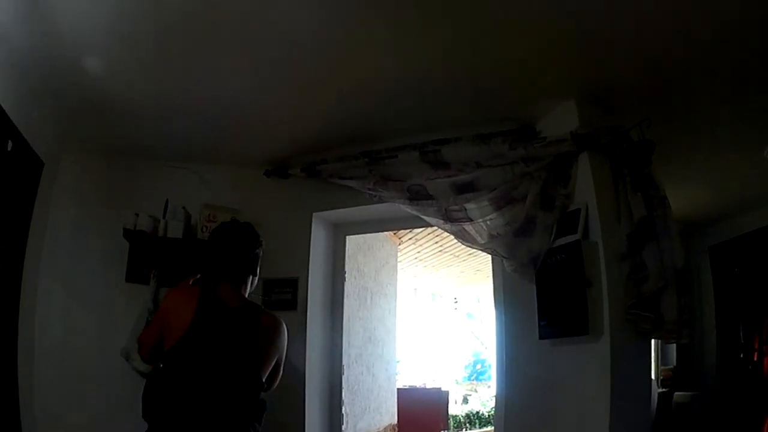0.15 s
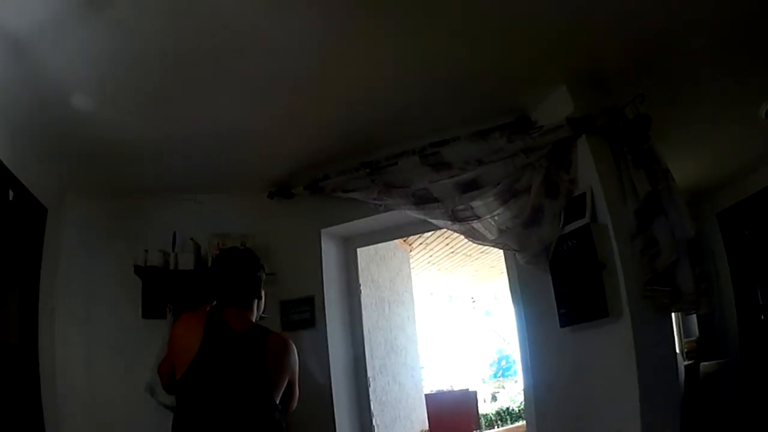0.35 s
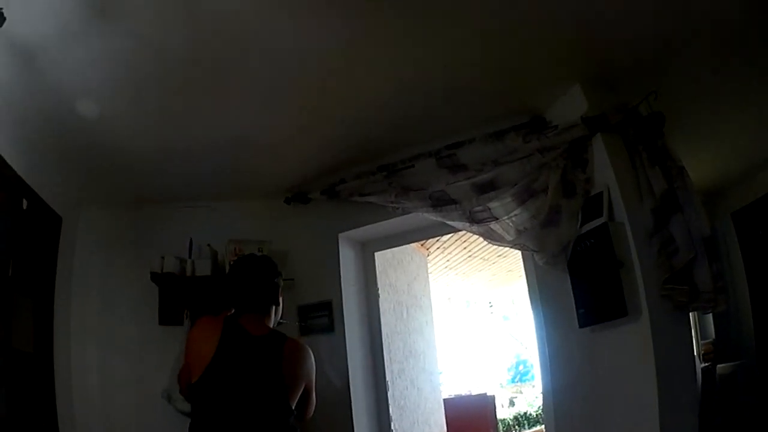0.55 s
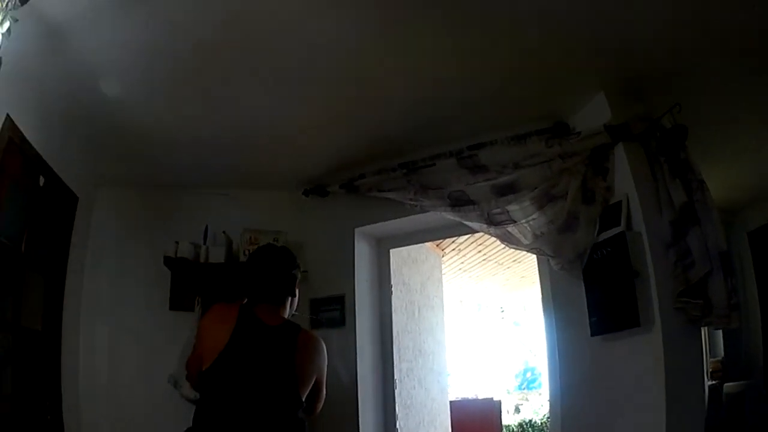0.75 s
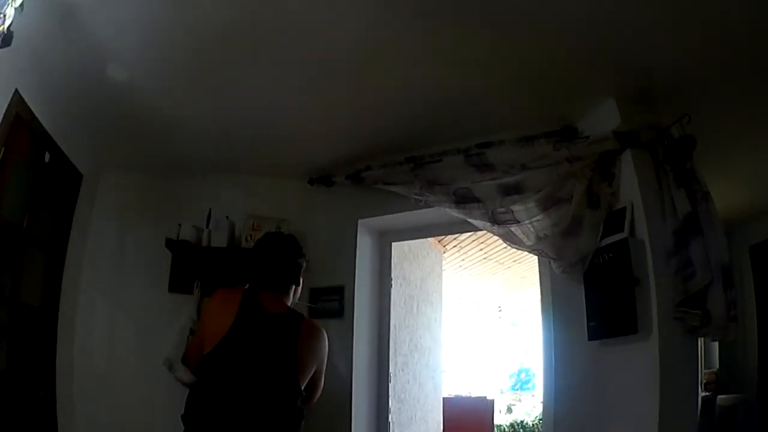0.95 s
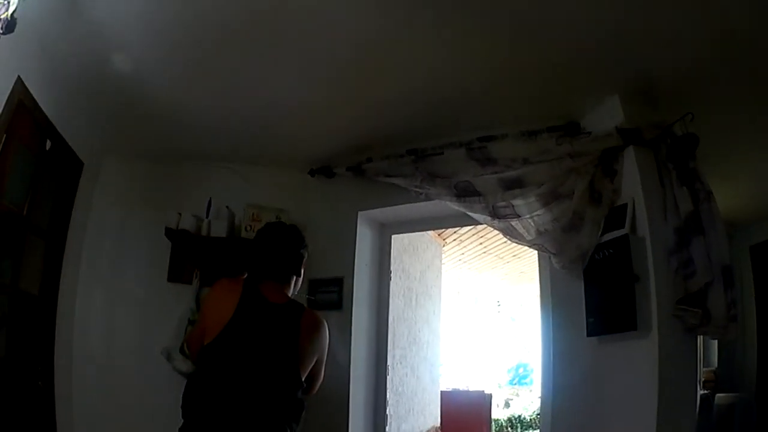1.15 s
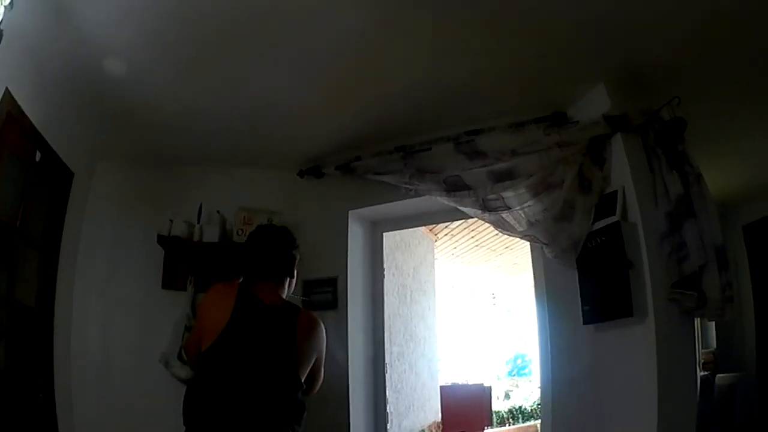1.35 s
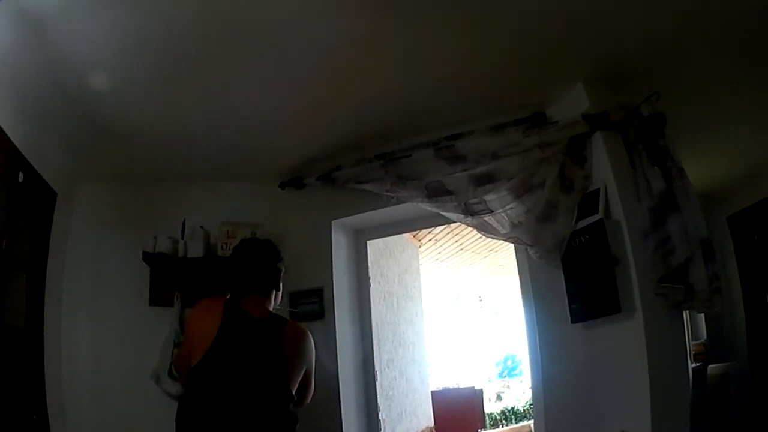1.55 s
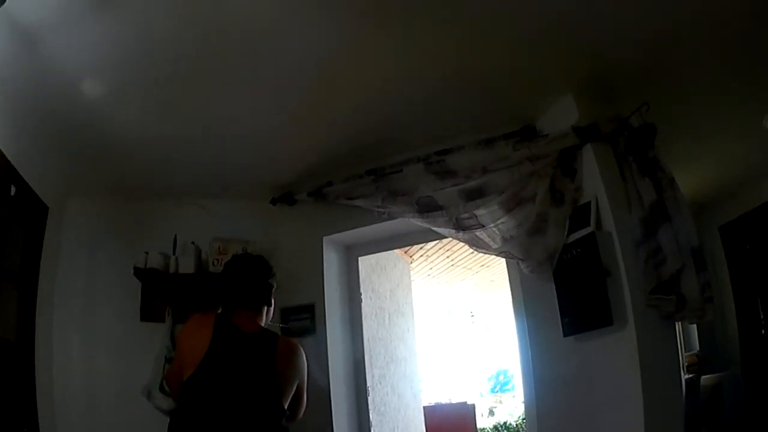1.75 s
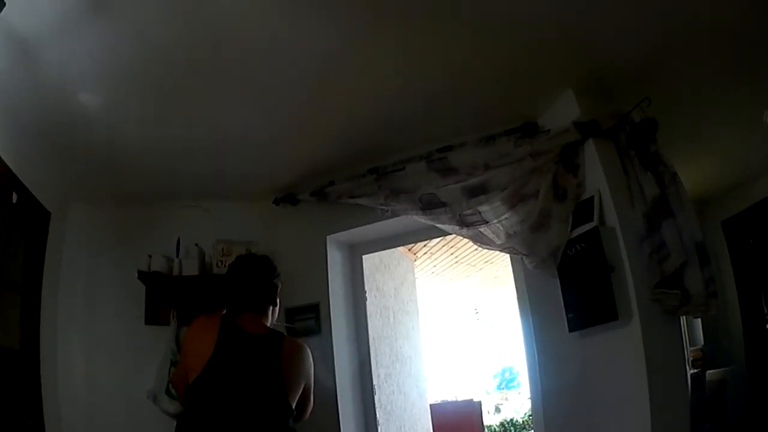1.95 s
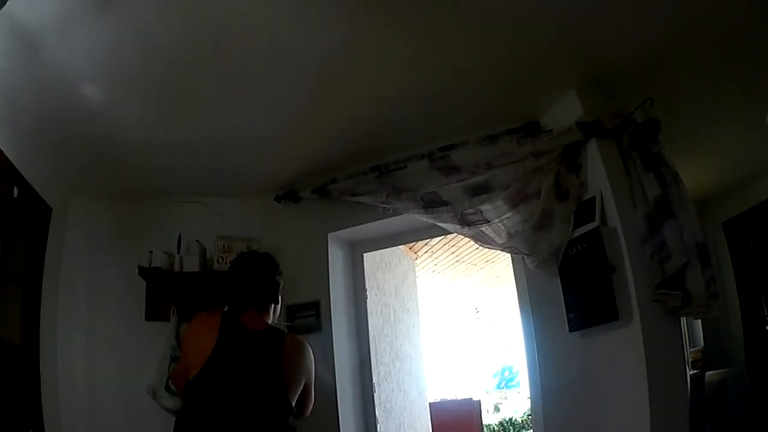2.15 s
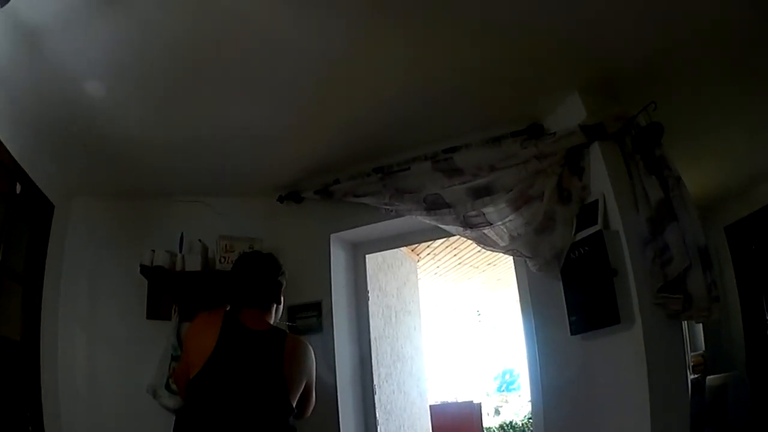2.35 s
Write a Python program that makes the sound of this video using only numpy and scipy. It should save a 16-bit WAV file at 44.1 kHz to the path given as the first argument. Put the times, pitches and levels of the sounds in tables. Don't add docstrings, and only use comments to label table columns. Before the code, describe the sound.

A hammer drill bores into a masonry wall in three loud pulsing surges indoors

```python
import sys
import numpy as np
from scipy import signal
from scipy.fft import rfft, irfft, next_fast_len
from scipy.io import wavfile
from scipy.ndimage import uniform_filter1d, minimum_filter1d

SR = 44100
rng = np.random.default_rng(int(sys.argv[2]) if len(sys.argv) > 2 else 0)


def boost_factor(decibels):
    exponent = np.asarray(decibels, float) / 20
    return 10 ** exponent


def materialize(psi):
    bounded = np.clip(np.atleast_2d(psi).T, -1, 1)
    quanta = np.round(bounded * 32767).astype(np.int16)
    wavfile.write(sys.argv[1], SR, quanta)


N = 110250
SIZE = next_fast_len(N + SR)
HZ = np.maximum(np.arange(SIZE // 2 + 1) * SR / SIZE, 1)


def rms_one(x):
    return x / np.sqrt(np.mean(x ** 2) + 1e-20)


def in_time(rows, column=1):
    rows = np.array(rows)
    return np.interp(np.arange(N) / SR, rows[:, 0], rows[:, column])


def at_hz(points, hz):
    points = np.array(points)
    return np.interp(np.log(hz), np.log(points[:, 0]), points[:, 1])


def colour(x, spectrum):
    gain = rms_one(boost_factor(at_hz(spectrum, HZ)))
    return irfft(rfft(x, SIZE) * gain, SIZE)[..., :N]


def ring(x, hz, t60):
    radius = boost_factor(-60 / (t60 * SR))
    angle = 2 * np.pi * hz / SR
    push = np.sqrt((1 - radius * radius) / 2) * np.array([1, 0, -1])
    return signal.lfilter(push, [1, -2 * radius * np.cos(angle), radius * radius], x + 1e-18)


def ring_all(make_drive, modes):
    return sum(boost_factor(db) * ring(make_drive(), hz, t60) for hz, db, t60 in modes)


# frequency in Hz, likeness from -1 to 1 [no unit].
STEREO_LIKENESS = [(40, .93), (200, .999), (530, .95), (1590, .8), (4740, .25), (14200, -.1)]


def pair(noises):
    mid, side = rfft(noises, SIZE)
    alike = np.clip(at_hz(STEREO_LIKENESS, HZ), -1, 1)
    return (np.sqrt(1 + alike) * mid + np.sqrt(1 - alike) * side * [[1], [-1]]) / np.sqrt(2)


# frequency in Hz, level in dB per Hz.
RUMBLE_COLOUR = [(15, -44), (25, -22), (96, -9.5), (129, -3), (278, -0.5), (649, -1.5), (1100, 3),
                 (14000, -38.5)]


def rumble():
    noise = irfft(pair(rng.standard_normal((2, SIZE))), SIZE)[:, :N]
    return boost_factor(-43) * rms_one(colour(noise, RUMBLE_COLOUR))


# time in seconds, speed in blows per second.
PISTON_SPEED = [(0.56, 0.0), (0.64, 14.15), (0.74, 40.54), (0.84, 36.41), (0.98, 22.79), (1.17, 8.98),
                (1.28, 25.61), (1.36, 39.39), (1.48, 36.72), (1.62, 23.73), (1.81, 12.4), (1.9, 28.4),
                (1.98, 43.29), (2.14, 41.2), (2.3, 25.77), (2.44, 16.58), (2.5, 14.26)]
# time in seconds, pressure on the tool in dB, motor load in dB.
TOOL_PUSH = [(.55, -12, -10.5), (.66, 2, -2), (.75, 0.5, -1), (.9, 1.5, -2), (1.05, 2, -4.5),
             (1.19, 5.5, -4), (1.27, -2, -2), (1.35, 7, 1), (1.5, 11, 10), (1.62, -1, -48),
             (1.78, 5.5, -3.5), (1.89, -1.5, -3), (1.96, 8.5, 7), (2.15, -2.5, -6.5), (2.3, 4.5, 0),
             (2.42, -2, -5.5), (2.5, 11.5, 0)]
PRESSURE, LOAD = 1, 2


def effort(db_per_decade, column=PRESSURE):
    full_speed = 40
    speed_db = db_per_decade * np.log10(in_time(PISTON_SPEED) / full_speed + 1e-3)
    return boost_factor(speed_db + in_time(TOOL_PUSH, column))


# frequency in Hz, level in dB per Hz.
MOTOR_COLOUR = [(60, -66), (200, -20), (600, -8.5), (1250, -6), (2100, 1.5), (4000, -4), (6000, -21.5),
                (13000, -36)]
# frequency in Hz, level in dB, time to fade 60 dB in seconds.
MOTOR_RUNG_MODES = [(213, -24, .25), (2230, -15, .03), (3870, -12, .035)]


def motor():
    rasp = colour(rng.standard_normal(N), MOTOR_COLOUR)
    rung = ring_all(lambda: rng.standard_normal(N), MOTOR_RUNG_MODES)
    return boost_factor(-13) * effort(23, LOAD) * (rasp + rung)


def blows():
    start_turn, jitter_s = .45, .0006
    turns = start_turn + np.cumsum(in_time(PISTON_SPEED)) / SR
    at = np.flatnonzero(np.diff(np.floor(turns)))
    late = jitter_s * SR * rng.standard_normal(99)[:len(at)]
    return np.clip(at + late.astype(int), 0, N - 1)


def bursts(at, spread_db):
    fade_s = 0.0041
    clicks = np.zeros(N)
    clicks[at] = boost_factor(spread_db * rng.standard_normal(99)[:len(at)])
    return signal.lfilter([1], [1, -np.exp(-1 / (fade_s * SR))], clicks + 1e-18)


def chatter():
    contacts_per_s, spread_db = 7100, 2.5
    strength = boost_factor(spread_db * np.minimum(rng.exponential(1, N), 3))
    sizes = strength * rng.choice([-1, 1], N)
    return rms_one((rng.random(N) < contacts_per_s / SR) * sizes)


# frequency in Hz, level in dB per Hz.
CRUNCH_COLOUR = [(120, -16.5), (400, -44), (1500, -34), (3700, 5.5), (4800, -2), (5900, -5.5),
                 (12300, -18.5), (14000, -67)]
# frequency in Hz, level in dB, time to fade 60 dB in seconds.
BIT_MODES = [(2230, -7, .03), (3870, 2, .04), (4970, -14, .02), (6290, -13, .025), (6630, -16, .025),
             (7300, -8, .02), (8320, -11, .025), (9550, -15, .02), (10000, -23, .025), (10700, -16, .018),
             (11900, -15, .018), (12300, -19, .025)]
# frequency in Hz, level in dB, time to fade 60 dB in seconds.
WALL_MODES = [(213, -3, .25), (150, -13, .1), (490, -14, .02), (650, -8, .03)]


def hammer():
    at = blows()
    blow_spread_db, bit_spread_db = 1.5, 3.0
    crunch = effort(44.5) * colour(bursts(at, blow_spread_db) * chatter(), CRUNCH_COLOUR)
    bit_force = effort(65)
    bit = ring_all(lambda: chatter() * bursts(at, bit_spread_db) * bit_force, BIT_MODES)
    starts = np.diff(bursts(at, blow_spread_db), prepend=0).clip(0)
    knock = starts * effort(5, LOAD)
    wall = ring_all(lambda: knock, WALL_MODES)
    return boost_factor(-7) * crunch + boost_factor(-10.5) * bit + boost_factor(-6) * wall


def dying(t60):
    tail = rng.standard_normal((2, SR)) * boost_factor(-60 * np.arange(SR) / SR / t60)
    return pair(tail / np.sqrt(np.mean(np.sum(tail ** 2, axis=1))))


# frequency in Hz, time to fade 60 dB in seconds.
ROOM_FADE = [(200, 0.9), (1000, 1), (4000, 0.63), (12000, .2)]


def late_echoes():
    echoes = 0
    for hz in 50 * 4. ** np.arange(6):
        band = np.clip(1 - abs(np.log(HZ / hz) / np.log(4)), 0, 1)
        echoes = echoes + band * dying(at_hz(ROOM_FADE, hz))
    return echoes


# frequency in Hz, level in dB.
LATE_LEVEL = [(200, 3.5), (1500, 6), (4000, 3), (8000, 10), (13000, 11)]
# frequency in Hz, left minus right in dB.
LEFT_LEAN = [(400, 0), (700, -1), (2000, .5), (5000, -1), (9000, 1), (13000, 4)]


def room(x):
    places, right_lag_s, early_t60_s = 7, .00004, 0.05
    lag = np.exp(-2j * np.pi * HZ * right_lag_s * np.array([[0], [1]]))
    out = lag * rfft(x, SIZE)
    steps = np.arange(N) / N * (places - 1)
    for place in range(places):
        here = np.cos(np.pi / 2 * np.clip(steps - place, -1, 1))
        late = boost_factor(at_hz(LATE_LEVEL, HZ)) * late_echoes()
        early = boost_factor(-0.5) * dying(early_t60_s)
        out = out + rfft(x * here, SIZE) * (early + late)
    lean_db = at_hz(LEFT_LEAN, HZ) * [[.5], [-.5]]
    return irfft(out * boost_factor(lean_db - 4.5), SIZE)[:, :N]


def scene():
    bass_cut = signal.butter(4, 96, "high", fs=SR, output="sos")
    tool = signal.sosfilt(bass_cut, hammer() + motor())
    return room(tool) + rumble()


def band_limit(x):
    return signal.sosfilt(signal.butter(12, 14750, fs=SR, output="sos"), x)


def record(dry):
    limit, release_db_per_s, look_ahead_s = 0.99, 78.5, 0.0017
    over_db = np.maximum(20 * np.log10(abs(dry).max(axis=0) / limit + 1e-9), 0)
    slope = release_db_per_s * np.arange(N) / SR
    held_db = np.maximum.accumulate(over_db + slope) - slope
    ahead = int(look_ahead_s * SR) | 1
    held_db = uniform_filter1d(-minimum_filter1d(-held_db, ahead), ahead)
    top_cut = signal.butter(6, 13100, fs=SR, output="sos")
    mix = signal.sosfilt(top_cut, dry * boost_factor(-held_db))
    return band_limit(mix)


dry = scene()
out = record(dry)
materialize(out)
```